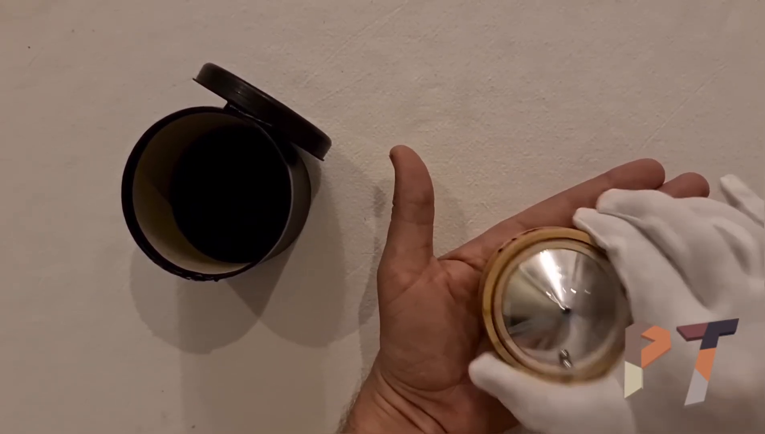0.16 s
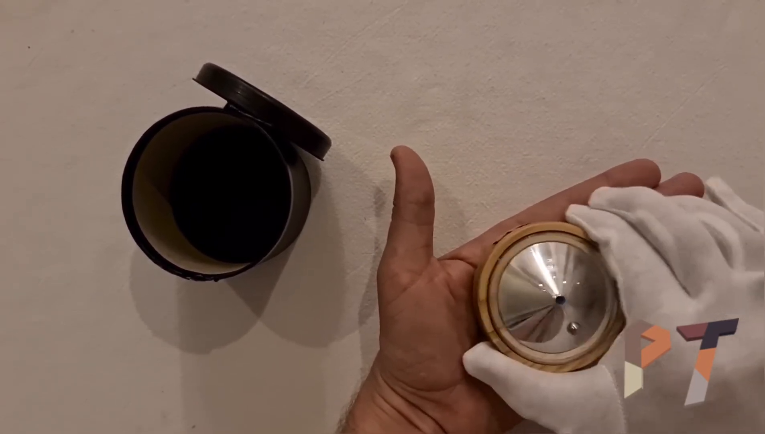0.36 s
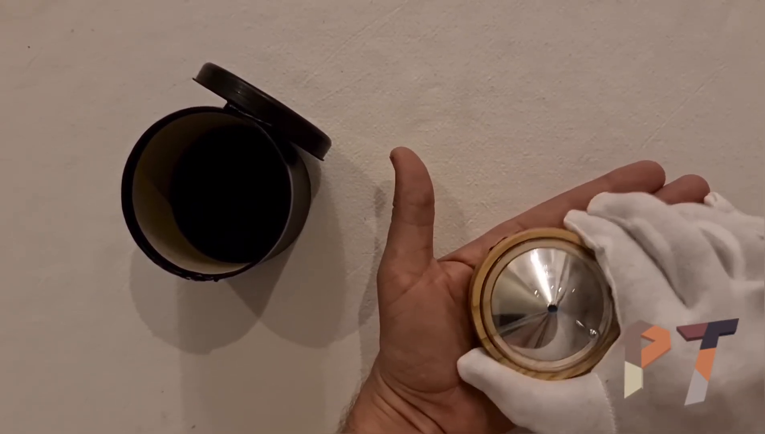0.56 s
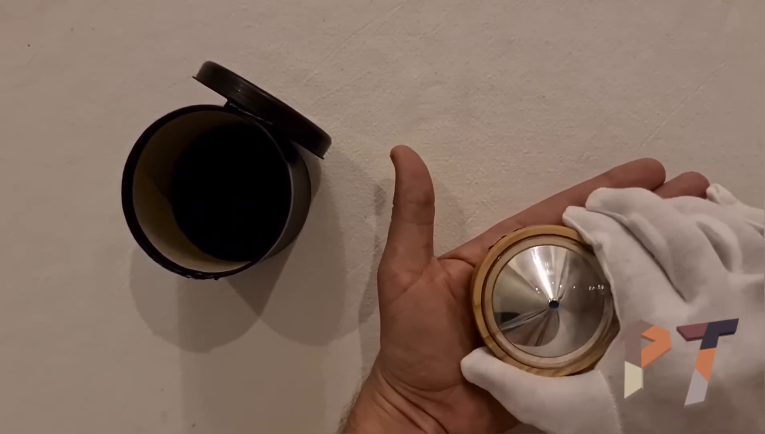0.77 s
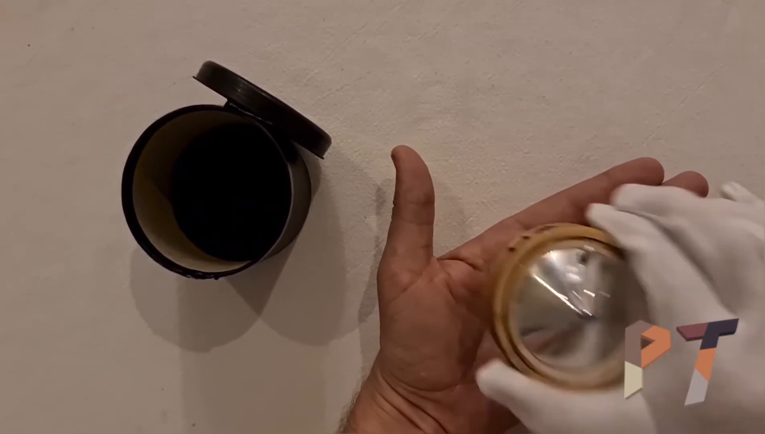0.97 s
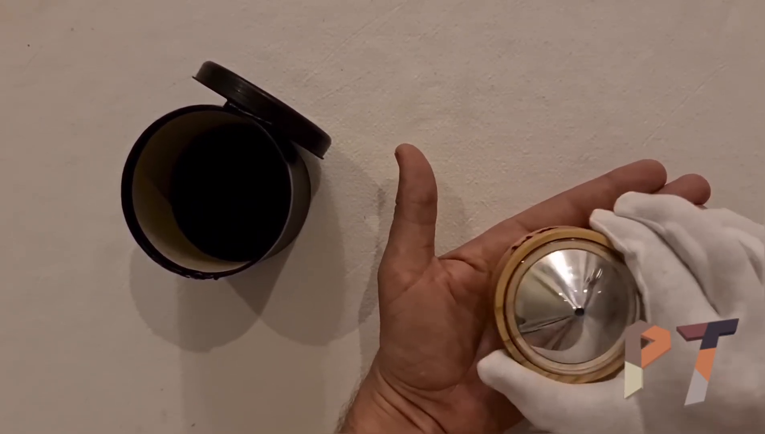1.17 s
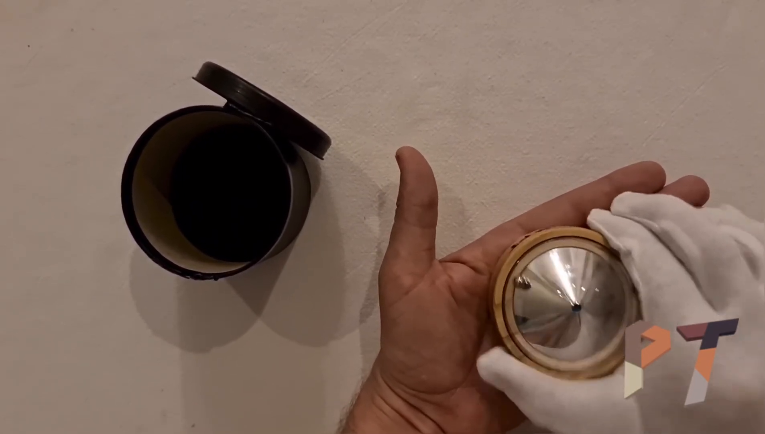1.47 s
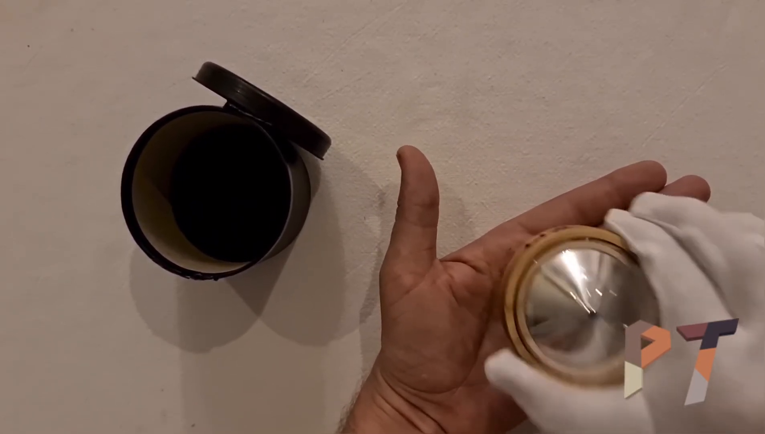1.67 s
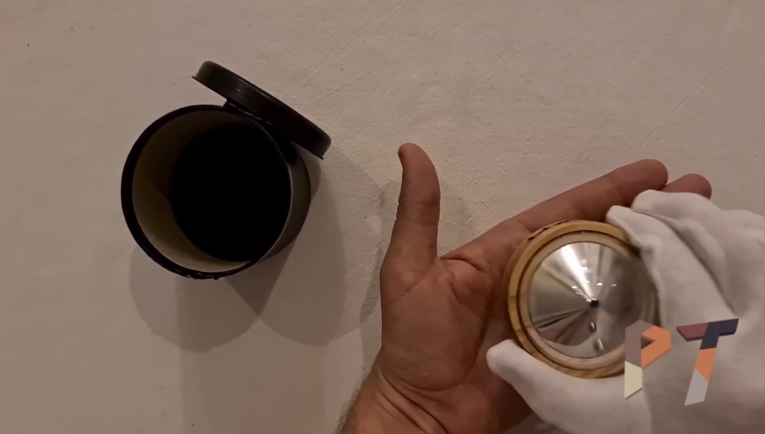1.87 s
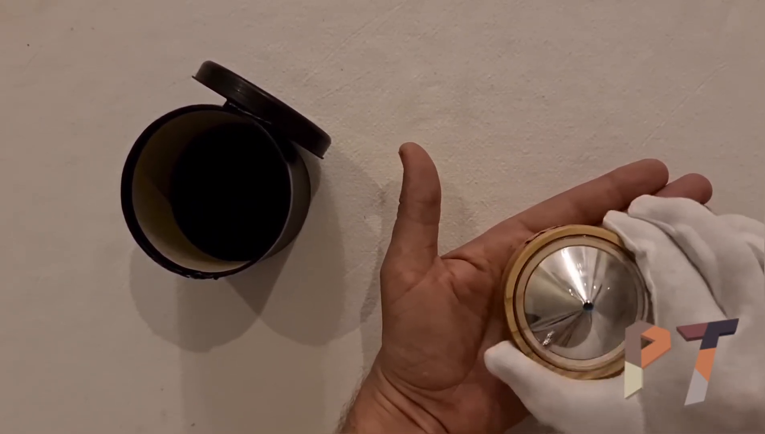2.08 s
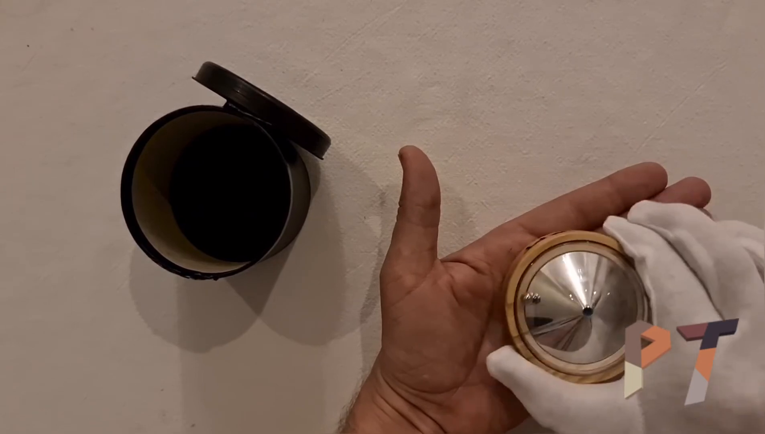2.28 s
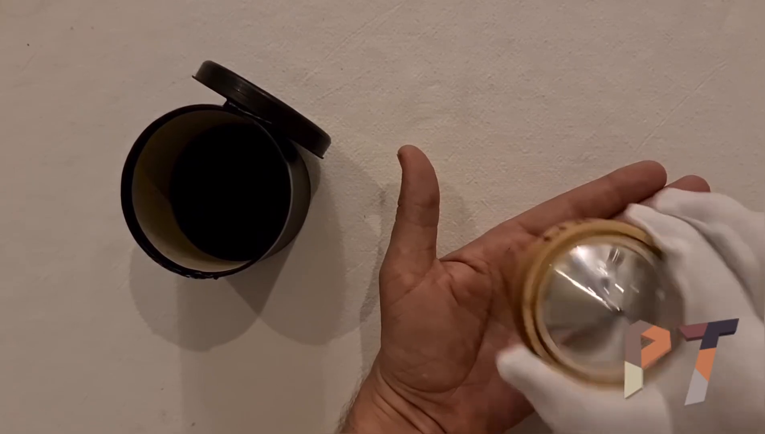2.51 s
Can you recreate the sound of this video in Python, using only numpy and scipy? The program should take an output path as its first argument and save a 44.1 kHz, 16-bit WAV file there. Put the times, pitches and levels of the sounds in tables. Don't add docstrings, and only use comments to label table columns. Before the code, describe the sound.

A steel ball rattles in a small glass-covered wooden puzzle shaken about six times a second, sharp clicks clustering between brief hissy rolls, with soft hand thumps, close-miked in a quiet small room.

```python
import sys
import numpy as np
from scipy import signal
from scipy.fft import rfft, irfft
from scipy.io import wavfile
from scipy.ndimage import uniform_filter1d

SR = 44100
rng = np.random.default_rng(int(sys.argv[2]) if len(sys.argv) > 2 else 0)


def rack_gain(trim_db):
    fader = np.asarray(trim_db, float)
    return 10 ** (fader / 20)


def put_to_file(sound):
    columns = np.atleast_2d(sound).T
    safe = np.clip(columns, -1, 1)
    whole_steps = np.round(safe * 32767)
    wavfile.write(sys.argv[1], SR, whole_steps.astype(np.int16))


N = 116865

# start in seconds, end in seconds, first level in dB, last level in dB.
ROLLS = [(0, 0.065, -36.5, -55.5), (0.096, 0.216, -50.5, -43.5), (0.285, 0.41, -42.5, -44.5),
         (0.448, 0.555, -37.5, -51), (0.603, 0.718, -38, -46.5), (0.759, 0.878, -36, -51),
         (0.916, 1.032, -36, -53.5), (1.079, 1.19, -41.5, -59), (1.23, 1.266, -47, -56),
         (1.261, 1.322, -45, -52), (1.331, 1.371, -43.5, -58.5), (1.427, 1.522, -42.5, -49.5),
         (1.597, 1.696, -49, -45), (1.781, 1.893, -44, -55), (1.942, 2.063, -50.5, -41.5),
         (2.102, 2.136, -46, -51), (2.14, 2.222, -30.5, -47.5), (2.293, 2.412, -47, -45),
         (2.461, 2.558, -39.5, -56), (2.615, 2.649, -54, -66.5)]
# start in seconds, glass level in dB, cone ring in dB relative to glass, wood in
# dB relative to glass, strongest glass pitch in Hz.
BOUNCES = [(0.1067, -42.5, 0, -12.5, 9030), (0.148, -14.5, -2.5, -16, 13300),
           (0.1636, -13.5, -23, -12, 10800), (0.1804, -27, -22, -18, 11100),
           (0.298, -8, -22.5, -11, 10840), (0.3186, -15, -8, -16, 10100),
           (0.3402, -15.5, -20, -12.5, 10900), (0.3554, -24.5, -11, -21, 14600),
           (0.3676, -19, -21, -15, 10800), (0.4469, -19.5, -13, -17, 13000),
           (0.464, -9, -22.5, -13.5, 11600), (0.486, -15.5, -6, -20, 10700),
           (0.4968, -11, -15, -24, 13500), (0.5008, -8, -12, -30.5, 12900),
           (0.511, -21, -10, -25, 9380), (0.5212, -19, -22, -17, 13500),
           (0.611, -9.5, -8, -12, 11000), (0.6246, -10, -6.5, -12, 10700),
           (0.6384, -11.5, -26, -14, 15000), (0.6761, -13.5, -18, -16, 13100),
           (0.6837, -21, -3, -27, 9430), (0.7647, -21, -2, -9, 10300),
           (0.7795, -7.5, -20, -15.5, 13300), (0.7981, -18.5, -7, -22, 10700),
           (0.81, -13.5, -20, -27, 13100), (0.8386, -12.5, -17, -20.5, 13000),
           (0.8544, -24.5, -15, -17, 13100), (0.921, -14, -10.5, -12, 10800),
           (0.9351, -9, -7.5, -17.5, 10200), (0.9518, -10.5, -19, -10.5, 12200),
           (0.9687, -14, -34, -32.5, 12300), (0.9961, -16.5, -16, -22.5, 12500),
           (1.0017, -19, -13, -22, 10700), (1.077, -20, -20, -10.5, 10800),
           (1.1149, -20.5, -4.5, -16, 10800), (1.134, -21.5, -27, -18, 11000),
           (1.15, -23, -17, -17.5, 10700), (1.277, -20.5, -18, -6.5, 12000),
           (1.3236, -8.5, -17, -24, 12300), (1.4663, -6, -4.5, -20, 12000),
                (1.4791, -9, -15, -24, 10800), (1.4954, -23, -15, -15, 10600),
                (1.6102, -14, -17, -5.5, 12500), (1.647, -16.5, -24, -19, 14700),
                (1.6728, -18.5, -15, -21.5, 15000), (1.685, -40, -18, -29, 11600),
                (1.694, -40, -2, -17, 14800), (1.703, -27.5, -9.5, -16, 14800),
                (1.7858, -37.5, -9, -7, 11100), (1.8258, -17, -14, -18, 14800),
                (1.8363, -14, -7, -16, 12600), (1.8516, -23.5, -7, -20, 13400),
                (1.9586, -7.5, -12.5, -13.5, 14900), (1.9788, -18.5, -5, -14.5, 10800),
                (2.0021, -16, -22, -13.5, 15200), (2.06, -21.5, -9, -17, 15100),
                (2.1474, -10, -24, -16, 11600), (2.1798, -11.5, -40, -22, 14600),
                (2.1978, -21.5, -25, -23, 10700), (2.209, -23, -22, -29, 10800),
                (2.3268, -24, -7, -17, 11100), (2.3524, -13, -31, -22, 10900),
                (2.3665, -11.5, -8, -21.5, 9300), (2.3705, -6, -22, -22, 10700),
                (2.3776, -28, -15, -15, 10700), (2.3883, -27, -30, -15, 12800),
                (2.3986, -26.5, -26, -27, 10700), (2.4667, -13.5, -48, -7, 12100),
                (2.4816, -12, -24, -19, 11900),
           (1.3056, -23, -22, -10, 12800), (2.3138, -4, -19, -17, 12500),
                     (2.501, -14, -18, -16, 12900), (1.3135, -28, -20, -25, 11000),
                     (1.339, -26, -3, -25, 11700), (1.4605, -12, -20, -14, 14500),
                     (1.511, -26, -15, -20, 11000), (2.1425, -18, -5, -12, 9800),
                     (2.316, -13, -20, -25, 11500), (2.5261, -11, -16, -20, 13200),
                     (2.529, -14, -12, -19, 12500)]
# frequency in Hz, level in dB, t60 in seconds, left-right difference in dB.
GLASS = [(7240, -8, 0.0088, 16.5), (9530, -14, 0.022, 10.5), (10700, -1.5, 0.0079, 9),
         (11910, -1.5, 0.014, 3), (12850, -2, 0.01, -2.5), (14760, 5, 0.0057, 2)]
# frequency in Hz, level in dB, t60 in seconds, left-right difference in dB.
CONE = [(5765, 6, 0.022, 10), (5842, -4.2, 0.027, 13), (4990, -4.5, 0.0059, 3)]
# frequency in Hz, level in dB, t60 in seconds, left-right difference in dB.
WOOD = [(1150, -5, 0.0083, -5.5), (2055, 0.5, 0.033, 1), (2310, 8.5, 0.011, -1), (2810, 4.5, 0.0068, -3),
        (3240, -10, 0.02, 6)]
# frequency in Hz, level in dB, t60 in seconds,
# left-right difference in dB.
WOOD_LOOSE = [(1168, -3, 0.0092, -5.5), (2150, -30, 0.026, 0), (2473, 1.5, .012, -5.5),
              (2773, 16.5, 0.0059, 1.5), (3343, -7.5, 0.021, -2.5)]
# lower edge in Hz, upper edge in Hz.
RADIATED_HZ = [(7040, 22000), (3420, 5747), (933, 6500)]
BOUNCE_SHARE_DB = [-6.5, -2.5, -4]
ROLL_SHARE_DB = [6.5, 1.5, -8]
# start in seconds, level in dB, swing in Hz, puff in dB relative to the swing,
# top of the puff in Hz.
THUMPS = [
    (0.139, -42, 54.4, -15.5, 200),
    (0.295, -33.5, 59.5, -18, 202),
    (0.445, -32, 73, -10, 188),
    (.465, -32, 71, -10, 197),
    (0.605, -27.5, 63, -15, 705),
    (.765, -32.5, 62, -11.5, 696),
    (0.921, -25, 60.5, -22, 300),
    (1.079, -30.5, 62, -21, 252),
    (1.952, -34, 66, -24, 202),
]
# frequency in Hz, density in dB per Hz.
ROOM_FLOOR = [(25, -7), (60, -1.5), (118, -4), (190, -16), (620, -22), (5700, -32.5), (16000, -64)]


def evened(x):
    return x / np.sqrt(np.mean(x ** 2) + 1e-20)


def add(mix, s, sound):
    part = mix[..., max(round(s * SR), 0):][..., :sound.shape[-1]]
    part += sound[..., :part.shape[-1]]


def ring(modes, band_hz, luck, focus_hz=-1e5, lag=0., damp=0.95):
    scatter_db, detune = 3, 0.008
    focus_db, focus_width_hz = 6, 750
    hz, db, t60, pan_db = np.transpose(modes)[:, :, None]
    a = luck[:len(modes), :, None]
    t = np.arange(1024) / SR - lag * np.maximum(16 - hz / 1000, 0)
    focus = np.exp(-((hz - focus_hz) / focus_width_hz) ** 2)
    db = db + scatter_db * a[:, 0] + focus_db * focus
    side = np.array([0.5, -0.5])[:, None, None]
    phase = 2 * np.pi * hz * (1 + detune * a[:, 1]) * t
    phase = phase + side * a[:, 2] * (1.2 + hz / 9000)
    decay = rack_gain(db + side * pan_db - 60 * abs(t) / (damp * t60))
    out = ((t >= 0) * decay * np.sin(phase)).sum(1)
    out = signal.sosfilt(signal.butter(4, band_hz, "band", fs=SR, output="sos"), out)
    return out / np.sqrt((out[:, :128] ** 2).mean())


def bodies(luck, s, focus_hz, low_hz, damp=0.83):
    lag_s_per_khz, grip_shifts_s = 0.00015, 1.2
    minor = []
    for u in np.linspace(0, 1, num=34):
        minor.append((8385 + u * (14970 - 8385), -16.5, 0.014, 11.5 * (1 - u)))
    wood = WOOD_LOOSE if s > grip_shifts_s else WOOD
    return [ring(GLASS + minor, (low_hz, RADIATED_HZ[0][1]), luck, focus_hz, lag_s_per_khz, damp),
            ring(CONE, RADIATED_HZ[1], 0.5 * luck[8:]),
            ring(wood, RADIATED_HZ[2], 0.5 * luck[16:])]


def rolling():
    per_s, size_db, lump_db = 5000, 2.5, 3
    same = 0.36
    on_s, off_s = 0.0063, 0.0031
    low_hz, damp, vary = 7870, 0.4, 1.32
    out = np.zeros((2, N))
    size = rng.standard_normal((3, N)) * rack_gain(size_db * np.minimum(rng.exponential(1, N), 4))
    size = size * (rng.random(N) < per_s / SR)
    lumps = uniform_filter1d(rng.standard_normal(N), size=150)
    lumps = evened(uniform_filter1d(lumps, size=150))
    grit = np.sqrt(same) * size[0] + np.sqrt(1 - same) * size[1:]
    grit = grit / size.std() * rack_gain(lump_db * lumps)
    for start, end, first_db, last_db in ROLLS:
        t = np.arange(round(start * SR), min(round((end + 0.0426) * SR), N))
        u = t / SR
        edge = np.clip((u - start) / on_s, 0, 1) ** 2 * np.exp(np.minimum(end - u, 0) / off_s)
        level = edge * rack_gain(np.interp(u, [start, end], [first_db, last_db]))
        travel = np.pi / 2 * np.clip((u - start) / (end - start), 0, 1)
        for share in np.cos(travel), np.sin(travel):
            luck = vary * rng.standard_normal((40, 3))
            parts = bodies(luck, start, rng.uniform(7700, 14800), low_hz, damp)
            body = np.zeros((2, 1024))
            for db, part in zip(ROLL_SHARE_DB, parts):
                body += rack_gain(db) * part / np.sqrt((part ** 2).sum() / 2)
            add(out, u[0], signal.fftconvolve(grit[:, t] * level * share, body, axes=1))
    return out


def room(x):
    room_db, t60 = -15, 0.12
    t = np.arange(SR // 2) / SR
    tail = rng.standard_normal((2, len(t))) * rack_gain(-60 * t / t60) * (t > 0.003)
    return rack_gain(room_db) * signal.fftconvolve(x, tail / np.linalg.norm(tail[0]), axes=1)[:, :N]


def air():
    wash_db, same = -64, 0.55
    hum_hz, hum_width_hz, hum_db = 287.8, 19.5, -73.5
    hz = np.fft.rfftfreq(N, 1 / SR)
    f, db = np.transpose(ROOM_FLOOR)
    z = rfft(rng.standard_normal((4, N)))
    colour = rack_gain(np.interp(np.log(hz + 1), np.log(f), db))
    wash = irfft((same * z[0] + (1 - same) * z[1:3]) * colour, N)
    hum = irfft(z[3] / (1 + ((hz - hum_hz) / hum_width_hz) ** 2), N)
    return rack_gain(wash_db) * evened(wash) + rack_gain(hum_db) * evened(hum)


def bounces():
    rise_s, chatter_s, chatter_db = 0.00048, 0.0014, 6
    out = np.zeros((2, N))
    t = np.arange(-128, 400) / SR
    shape = np.where(t < 0, np.exp(-(t / rise_s) ** 2), np.exp(-t / chatter_s))
    for s, db, cone_db, wood_db, focus_hz in BOUNCES:
        luck = rng.standard_normal((40, 3))
        chatter = rng.standard_normal(len(t)) * shape
        drive = rack_gain(chatter_db) * chatter / np.linalg.norm(chatter) + (t == 0)
        drive = drive / np.linalg.norm(drive)
        gains = rack_gain(db + np.add(BOUNCE_SHARE_DB, [0, cone_db, wood_db]))
        parts = bodies(luck, s, focus_hz, RADIATED_HZ[0][0])
        body = sum(gain * part for gain, part in zip(gains, parts))
        add(out, s + t[0], signal.fftconvolve(body, drive[None], axes=1))
    return out


def creak():
    start_s, hz, db, length_s = 0.118, 415, -64, 0.012
    u = np.arange(N) / SR - start_s
    return rack_gain(db) * np.exp(-(u / length_s) ** 2) * np.sin(2 * np.pi * hz * u)


def thumps():
    rise_s, swing_t60 = 0.0044, 0.14
    after_hz, after_db, after_t60 = 32.7, -13, 0.28
    puff_t60, puff_side = 0.1, 0.45
    out = np.zeros((2, N))
    t = np.arange(SR // 4) / SR
    after = rack_gain(after_db - 60 * t / after_t60) * np.sin(2 * np.pi * after_hz * t)
    for s, db, swing_hz, puff_db, top_hz in THUMPS:
        swing = rack_gain(-60 * t / swing_t60) * np.sin(2 * np.pi * swing_hz * t)
        z = rng.standard_normal((3, len(t)))
        dull = signal.butter(2, (90, top_hz), "band", fs=SR, output="sos")
        puff = evened(signal.sosfilt(dull, z[0] + puff_side * z[1:]))
        puff = rack_gain(puff_db - 60 * t / puff_t60) * puff
        add(out, s, rack_gain(db) * (1 - np.exp(-t / rise_s)) * (swing + after + puff))
    return out


def scene():
    ball = rolling() + bounces()
    return ball + room(ball) + air() + creak() + thumps()


def low_pass(x):
    return signal.sosfilt(signal.butter(12, 16680, fs=SR, output="sos"), x)


def record(dry):
    notch_hz, notch_width_hz, notch_db, edge_hz = 6700, 330, -11, 15530
    gate_db, gate_depth_db, gate_slope, gate_s = -65, -10, 0.99, 0.024
    hz = np.fft.rfftfreq(N, 1 / SR)
    notch = rack_gain(notch_db * np.exp(-((hz - notch_hz) / notch_width_hz) ** 2))
    miked = irfft(rfft(dry) * notch / (1 + (hz / edge_hz) ** 60), N)
    high = signal.sosfiltfilt(signal.butter(2, 500, "high", fs=SR, output="sos"), miked)
    power = uniform_filter1d((high ** 2).mean(0), size=int(gate_s * SR))
    level_db = 10 * np.log10(abs(power) + 1e-12)
    gain = rack_gain(np.clip(gate_slope * (level_db - gate_db), gate_depth_db, 0))
    gated = miked + (gain - 1) * high
    return low_pass(np.clip(gated, -1, 1))


dry = scene()
out = record(dry)
put_to_file(out)
```